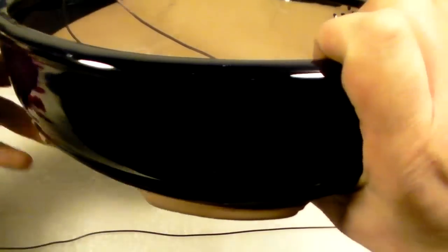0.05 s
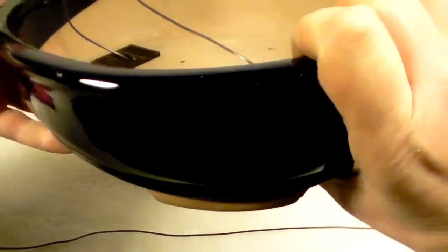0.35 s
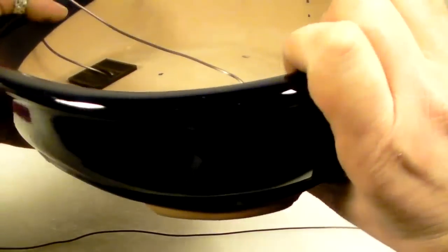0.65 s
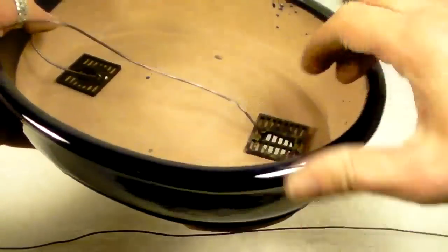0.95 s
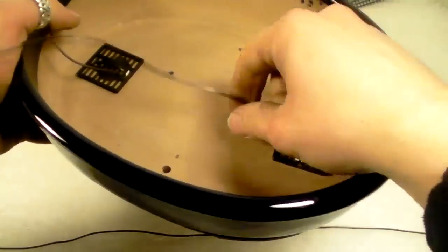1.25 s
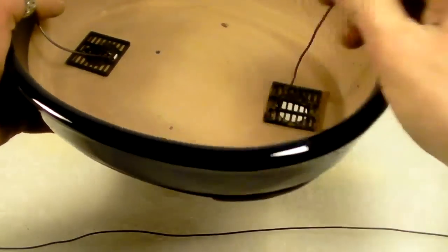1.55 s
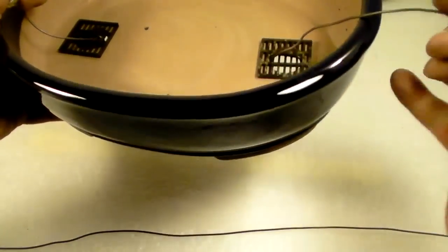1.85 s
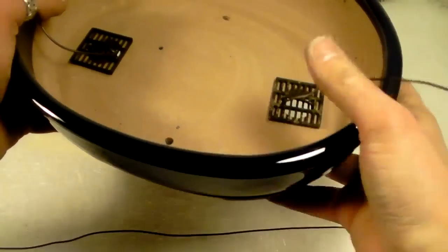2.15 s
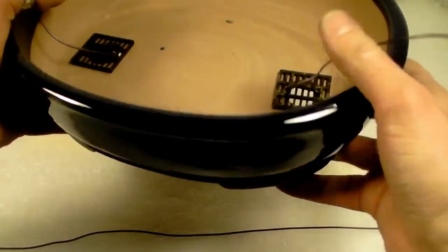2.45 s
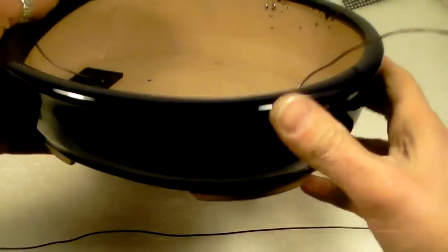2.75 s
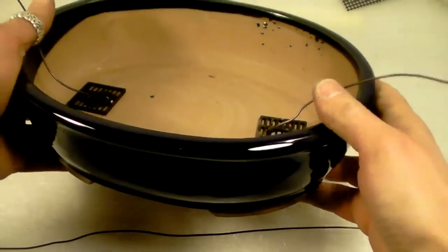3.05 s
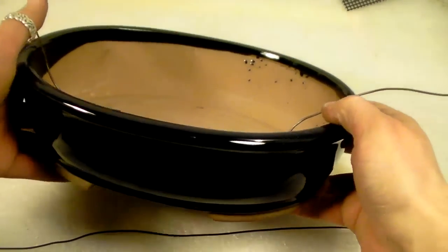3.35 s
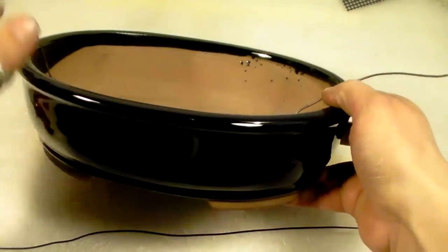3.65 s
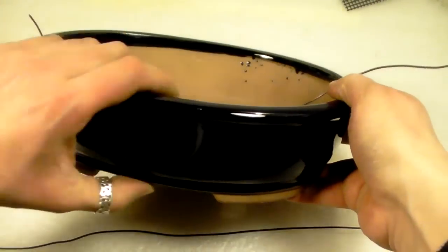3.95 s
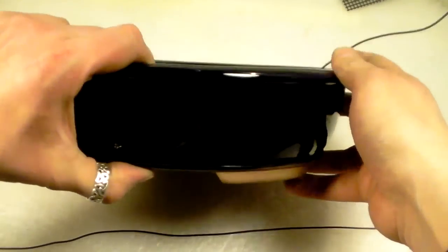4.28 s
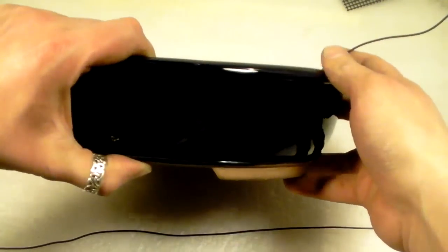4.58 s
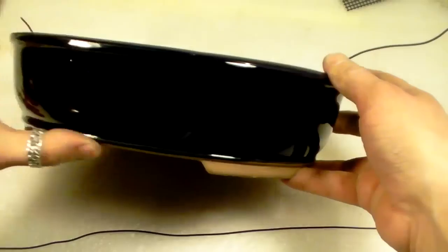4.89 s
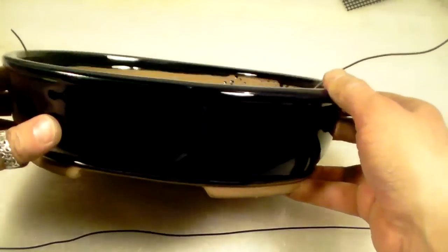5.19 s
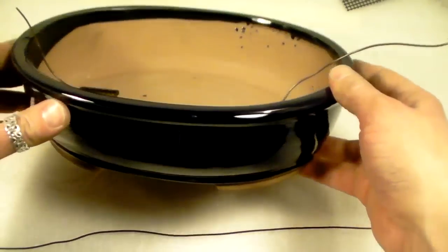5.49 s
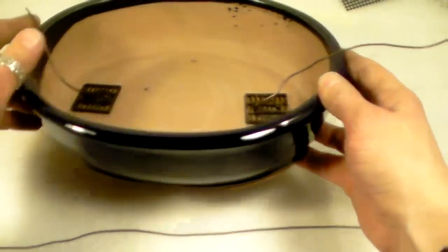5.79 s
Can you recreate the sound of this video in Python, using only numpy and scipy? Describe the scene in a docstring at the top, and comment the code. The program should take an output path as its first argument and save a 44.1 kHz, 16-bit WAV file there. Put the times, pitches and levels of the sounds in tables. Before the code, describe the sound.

Hands turn a ceramic pot up close: brief ringing knocks, thin wire ticking and scraping inside, and fingers sliding over the glaze.

```python
"""Ceramic pot, turned by hand

Close on a glazed pot held over a table in a small room, with a closely spaced pair of microphones.
A knock on its wall rings it, and a wire with a mesh screen ticks and scrapes on its floor; the two
hands damp the ring. Skin slides over the glaze in fine slips. Behind it all lie a soft fan-like
rush, hiss and a thin electronic whine."""
import sys
import numpy as np
from scipy import signal
from scipy.fft import rfft, irfft, next_fast_len
from scipy.io import wavfile
from scipy.ndimage import map_coordinates

SR = 44100
rng = np.random.default_rng(int(sys.argv[2]) if len(sys.argv) > 2 else 0)


def generate_wav(signal):
    """Clip the signal to [-1, 1] and save it as 16-bit WAV at the path in sys.argv[1]."""
    frames = np.transpose(np.atleast_2d(signal))
    scaled = np.clip(frames, -1, 1) * 32767
    pcm = np.round(scaled).astype(np.int16)
    wavfile.write(sys.argv[1], SR, pcm)


N = 261327
T = np.arange(N) / SR
RING_T = T[:SR // 3]  # time axis of one contact, in seconds


def undb(db):
    """Decibels to gain."""
    return 10 ** (np.asarray(db) / 20)


def rms(x):
    """Root mean square."""
    return np.sqrt(np.mean(x ** 2)) + 1e-12


def fade(t, t60):
    """Decay by 60 dB in t60 seconds."""
    return np.exp(-np.log(1000) * t / t60)


def band(x, lo_hz, hi_hz, order=3):
    """Causal band-pass."""
    edges_hz = [lo_hz, min(hi_hz, SR / 2 - 10)]
    return signal.sosfilt(signal.butter(order, edges_hz, "band", fs=SR, output="sos"), x)


def colour(x, points):
    """Shape a sound by (Hz, dB) points; rms 1."""
    hz, db = np.transpose(points)
    size = next_fast_len(N)
    bin_hz = np.fft.rfftfreq(size, 1 / SR)
    gain = undb(np.interp(np.log(bin_hz + 1), np.log(hz), db))
    shaped = irfft(rfft(x, size) * gain, size)[..., :N]
    return shaped / rms(shaped)


def add(out, s, x):
    """Mix x in at s seconds."""
    i = int(s * SR)
    out[i:i + len(x)] += x[:N - i]


def swell(s, rise_s, fall_s):
    """A stroke speeds up smoothly to its peak at s, then slows to rest."""
    away = np.where(T < s, (s - T) / rise_s, (T - s) / fall_s)
    return np.cos(np.pi / 2 * np.clip(away, 0, 1)) ** 2


def slips(per_s, spread_db):
    """Stick-slip: tiny clicks at random moments, a few much larger than the rest; rms 1."""
    clicks = (rng.random(N) < per_s / SR) * rng.choice([-1, 1], N)
    clicks = clicks * undb(spread_db * np.minimum(rng.exponential(size=N), 4))
    return clicks / rms(clicks)


def background(level_db=-58, rush_side_db=-7, hiss_side_db=-4, skirt_db=-75):
    """Room tone: a steady low rush, a wider hiss, and an electronic whine with a narrow noisy skirt."""
    # Spectrum of the rush and hiss. Each row: frequency in Hz, relative density in dB.
    room_tone = [(25, -9), (50, -9), (90, -0.5), (170, -4), (280, -3), (420, 8), (600, -0.5), (1000, -4),
                 (2500, -10.5), (6300, -11.5), (8000, -13), (16000, -15)]
    # Tones of the whine. Each row: frequency in Hz, rms level in dB before panning.
    whine_tones = [(10181, -72.5), (10455, -69), (10725, -80)]
    mid, side = colour(rng.standard_normal((2, N)), room_tone)
    side = side * np.array([[1], [-1]])
    rush = band(mid + undb(rush_side_db) * side, 5, 1050)
    hiss = band(mid + undb(hiss_side_db) * side, 670, 20000)
    whine = sum(np.sqrt(2) * undb(db) * np.sin(2 * np.pi * (hz * T + rng.random()))
                for hz, db in whine_tones)
    pan_left = undb([[3], [-3]])
    skirt = band(rng.standard_normal((2, N)), 10500, 10940)
    return undb(level_db) * (rush + hiss) + whine * pan_left + undb(skirt_db) * skirt / rms(skirt)


def room(x, table_db=-6.5, walls_db=-10, treble_db=-5, side_db=-4, lag_us=13):
    """Quick scatter from table and hands, then the walls, heard by two closely spaced microphones."""
    t = T[:SR]
    wall_decay, treble_decay = fade(t, t60=.41), fade(t, t60=.63)
    echoes = []
    for early, late in rng.standard_normal((2, 2, SR)):
        early = early * fade(t, t60=.06) * (t > .0015)
        tail = band(late, 350, 6300) * wall_decay
        tail += undb(treble_db) * band(late, 8900, 23000) * treble_decay
        tail *= np.clip(t / .0068, 0, 1)
        response = undb(table_db) * early / np.linalg.norm(early)
        response += undb(walls_db) * tail / np.linalg.norm(late * wall_decay)
        echoes.append(signal.fftconvolve(x, response)[:N])
    mid, side = x + echoes[0], undb(side_db) * echoes[1]
    # the sound reaches the right microphone a moment later
    right = map_coordinates(mid - side, [(T - lag_us / 1e6) * SR], order=5)
    return np.array([mid + side, right])


def hand_thuds(hz=65, t60=.03):
    """The whole pot rocks once or twice in the hands."""
    # Soft thuds of a hand meeting the pot. Each row: start in seconds, starting level in dB.
    thuds = [(0.6, -50), (0.782, -53), (1.274, -54), (1.325, -49), (1.741, -48.5)]
    out = np.zeros(N)
    for s, db in thuds:
        add(out, s, undb(db) * np.sin(2 * np.pi * hz * RING_T) * fade(RING_T, t60))
    return out


def skin_ticks(t60=.0019):
    """Skin leaves the glaze with tiny dry snaps."""
    # The snaps. Each row: start in seconds, peak level in dB.
    ticks = [(3.432, -34.5), (3.908, -36.5), (3.937, -38), (3.969, -41), (4.135, -34), (4.141, -38),
             (4.151, -33), (4.584, -37.5), (4.9361, -25.5), (5.195, -34.5)]
    out = np.zeros(N)
    for s, db in ticks:
        snap = band(rng.standard_normal(len(RING_T)) * fade(RING_T, t60), 2900, 13800)
        add(out, s, snap * undb(db) / np.abs(snap).max())
    return out


def skin_slides(dull_db=-10, dull_share=.45, treble_db=5, treble_share=.83):
    """Dense fine slips of skin on the glaze; fast strokes are brighter, slow ones add a dull rub."""
    # Strokes of the hand. Each row: peak time, rise and fall in seconds, midrange level in dB,
    # brightness (top band against midrange) in dB.
    strokes = [(.2, .3, 0.39, -66, -21), (1.1, 0.25, 1, -67.5, -4), (2.66, 0.36, 0.38, -60.5, -16),
               (3.75, 0.77, 1, -71, -4), (3.47, 0.14, 0.14, -57, -9.5), (4.188, 0.051, 0.073, -43, -3),
               (4.235, .04, 0.057, -44.5, -3), (4.282, 0.049, 0.04, -42.5, 3.5),
               (4.304, 0.028, 0.069, -44.5, -5), (4.761, 0.03, 0.13, -52, -9),
               (4.9, 0.22, 0.092, -61.5, 0.5), (5.132, 0.17, 0.1, -54, -7), (5.268, 0.06, 0.037, -43.5, -3),
               (5.35, 0.27, 0.33, -62, -19), (5.894, 0.055, 0.057, -49, -8)]
    # Spectrum of sliding skin. Each row: frequency in Hz, relative level in dB.
    skin_colour = [(300, -10), (700, -8.5), (1000, 0.5), (1300, 9.5), (2000, 5.5), (2800, -2.5), (3800, -3),
                   (5000, 1), (6100, 1.5), (7600, -17), (9500, -9.5), (12000, -10), (16000, -7)]
    rub = colour(slips(per_s=7000, spread_db=2.0), skin_colour)
    bands_hz = [(400, 1100), (360, 4280), (3410, 9900), (8800, 13030)]  # dull, midrange, treble, top
    parts = [band(rub, lo_hz, hi_hz) for lo_hz, hi_hz in bands_hz]
    power = np.zeros((4, N))
    for s, rise_s, fall_s, db, bright_db in strokes:
        tilt_db = [dull_db - dull_share * bright_db, 0, treble_db + treble_share * bright_db, bright_db]
        power += np.outer(undb(db) * undb(tilt_db), swell(s, rise_s, fall_s)) ** 2
    return sum(envelope * part / rms(part) for envelope, part in zip(np.sqrt(power), parts))


def pot_ring(place):
    """The pot's answer to one tap; the place, from 0 (wall) to 1 (floor), decides which modes speak."""
    # Modes of the hand-held pot. Each row: frequency in Hz, 60 dB decay time in seconds,
    # relative level in dB when struck on the wall, and when struck on the floor.
    modes = [(677, .13, -8, -49), (786, 0.093, -6.5, -17), (1285, 0.023, 5, -41), (1431, 0.014, 2.5, -30),
             (1571.3, 0.15, -16, -6.5), (1640, 0.15, -5, -18.5), (1742, 0.026, 1.5, -11),
             (1938, 0.17, -16.5, -33.5), (2314, 0.13, -21, -38), (2692, 0.0423, -36, 5.5),
             (2720, 0.084, -16, -7), (2797, 0.038, -3, -9.5), (3040, 0.21, -17, -19),
             (3924, .06, -12, -2.5), (4250, 0.051, 6.5, -17), (4337, 0.021, -1.5, -4.5),
             (4595, 0.077, -12.5, -14), (4803, 0.051, 3, -4.5), (4940, 0.0337, -4.5, -29.5),
             (5733, 0.026, 9.5, -10), (6064, 0.095, -29, 2), (6234, 0.05, -32, -9.5),
             (6320, 0.014, -9.5, 5.5), (6950, 0.13, -25.5, -11), (9080, 0.064, -17, -7),
             (9440, 0.085, -9, -19.5), (9750, 0.072, -19, -27), (12400, .03, -26, -10),
             (12930, 0.066, -31, -5)]
    out = np.zeros(len(RING_T))
    for k, (hz, t60, wall_db, floor_db) in enumerate(modes):
        gain = (-1) ** k * undb(wall_db + place * (floor_db - wall_db))
        out += gain * np.sin(2 * np.pi * hz * RING_T) * fade(RING_T, t60)
    return out


def metal_scrapes(body_db=-2.04, grit_db=-5, soft_hz=7500):
    """The wire catches on the floor, or a finger ring on the wall; slips ring the pot and spit grit."""
    # Strokes of metal. Each row: peak time, rise and fall in seconds, level in dB,
    # hiss in dB relative to that level, place from 0 (wall) to 1 (floor).
    strokes = [(.19, 0.2, 0.24, -54.5, -1, .4), (0.24, .04, 0.016, -40, -3, 1),
               (0.488, 0.14, 0.3, -58.5, -2.5, .5), (0.639, 0.042, 0.061, -43.5, -18, 0.17),
               (.73, 0.097, 0.085, -46.5, -0.5, 0.43), (.766, 0.019, 0.028, -38, -10, 0.13),
               (1.15, 0.039, 0.045, -64.5, 4, 0.44), (1.291, 0.0095, 0.011, -35.5, 3, 0.48),
               (1.41, 0.088, 0.16, -53, -1, 0.71), (1.5, .05, 0.052, -58.5, 10, 0.74),
               (1.57, 0.13, 0.17, -59, -3, 0.96), (1.79, 0.12, 0.2, -56, 0, 0.63),
               (2.23, 0.085, .06, -65, -1, 0.84), (2.535, 0.038, 0.037, -50, -7, .8),
               (2.56, 0.23, .17, -58, -3, 0.6), (2.88, 0.097, 0.049, -63, 3, 0.33),
               (3.159, 0.083, 0.17, -61, -6, 0.58), (3.94, 0.12, 0.26, -66, 4, 0.3),
               (4.09, 0.027, 0.059, -55, -0.5, 0.53), (4.62, 0.25, 0.14, -66.5, 9, 0.32),
               (4.84, 0.4, 0.27, -54.5, -1, 0.14)]
    power = np.zeros((3, N))
    for s, rise_s, fall_s, db, hiss_db, place in strokes:
        envelope = undb(db) * swell(s, rise_s, fall_s)
        power += np.outer([1 - place, place, undb(hiss_db) ** 2], envelope ** 2)
    on_wall, on_floor, hissing = np.sqrt(power)
    drag = slips(per_s=2000, spread_db=2.5)
    grit, hiss = band(drag, 1130, 5450), band(drag, 9550, SR / 2)
    out = np.hypot(on_wall, on_floor) * undb(grit_db) * grit / rms(grit)
    out += hissing * hiss / rms(hiss)
    for place, force in enumerate([on_wall, on_floor]):
        # a dragged contact is softer than a knock and favours the low modes, which ring on after it
        ring = signal.lfilter(*signal.butter(1, soft_hz, fs=SR), pot_ring(place))
        out += undb(body_db) * signal.fftconvolve(drag * force, ring / np.linalg.norm(ring))[:N]
    return out


def knocks(chatter_share=.37, crack_db=4.0, crack_t60=.028, contact_edge_ratio=1.09):
    """A tap and brief chatter ring the pot; the springy contact lifts one band, sharp metal sizzles."""
    # Contacts with the pot. Each row: start in seconds, level in dB, place from 0 (wall) to 1 (floor),
    # chatter decay in ms, contact resonance in Hz, its boost in dB, sizzle in dB relative to the level.
    contacts = [(0.081, -51, 0.56, 4.5, 705, 15, -15), (0.138, -46, 0.29, 0.78, 2720, 15, 3.5),
                (0.166, -45.5, 0.46, 10, 2920, 18, 5.5), (0.594, -20, 0, 1.6, 6200, 5, -21.5),
                (0.772, -42, 0.76, 0.75, 2350, 8, -21), (0.875, -58.5, 0.73, 1, 2600, 21, -26),
                (1.270, -24.5, 0.93, 5.3, 2560, 6, -6), (1.3205, -38.5, 0.58, 1.9, 5860, 21, -10),
                (1.3486, -37.5, 0.64, 1.5, 1600, 7, -18), (1.544, -52, .8, 3.3, 5400, -11, -6),
                (1.742, -42, .3, 0.64, 2800, 5.5, 0), (1.826, -61.5, 0.53, 2, 1610, 25, -12),
                (1.878, -58.5, 0.95, 3.7, 5000, -7, -6), (2.238, -59.5, 0.7, 5.3, 2320, 23, -4),
                (3.024, -60, 0.58, 3, 2970, -3, -11), (3.232, -53.5, 0.5, 9.3, 4140, 3, -8),
                (3.501, -51.5, 0.7, 9.2, 2030, 16, -12), (3.666, -59.5, 0.65, 15, 2450, 18, -21),
                (4.680, -48, 0.63, 9, 1010, 26, -17), (4.735, -53.5, 0.28, 23, 810, 29, -22),
                (5.717, -50, 0.52, 17, 4260, 0, 2.5), (5.772, -45.5, 0.94, 2.2, 3270, 6, -18)]
    # Spectrum of the pot's countless weak, short modes. Each row: frequency in Hz, relative level in dB.
    crack_colour = [(300, 18.5), (450, 14.5), (750, 13), (1000, 6), (1500, -38), (2200, 7), (3300, 0),
                    (4800, -10), (6300, 1.5), (7800, -3.5), (9500, 0), (16000, -0.5)]
    wall_low_hz, floor_low_hz = 560, 2140  # low cut: the light wire on the floor stirs little bass
    out = np.zeros(N)
    grain = colour(rng.standard_normal(N), crack_colour)
    for s, db, place, chatter_ms, contact_hz, boost_db, sizzle_db in contacts:
        push = rng.standard_normal(len(RING_T)) * np.exp(-RING_T * 1e3 / chatter_ms)
        push *= chatter_share * np.sqrt(chatter_ms) / np.linalg.norm(push)  # longer chatter, more energy
        push[0] += 1  # the tap itself
        crack = undb(crack_db) * np.roll(grain, -int(s * SR))[:len(RING_T)] * fade(RING_T, crack_t60)
        hit = signal.fftconvolve(push, pot_ring(place) + crack)[:len(RING_T)]
        spring = band(hit, contact_hz / contact_edge_ratio, contact_hz * contact_edge_ratio, order=1)
        low_hz = wall_low_hz * (floor_low_hz / wall_low_hz) ** place
        thinned = band(hit + undb(boost_db) * spring, low_hz, SR / 2, order=2)
        body, sizzle = band(thinned, 250, 6400), band(hit, 8500, 18000)
        for part, part_db in (body, db), (sizzle, db + sizzle_db):
            add(out, s, part * undb(part_db) / rms(part[:SR // 50]))  # level of the first 20 ms
    return out


def scene():
    """Everything done to the pot, in the room, over the room tone."""
    handling = knocks() + hand_thuds() + skin_ticks() + metal_scrapes() + skin_slides()
    return room(handling) + background()


def record(dry):
    """The recorder cuts the top octave short with a steep low-pass."""
    top_hz = 15900
    return signal.sosfilt(signal.ellip(10, .2, 70, top_hz, fs=SR, output="sos"), dry)


dry = scene()
out = record(dry)
generate_wav(out)
```